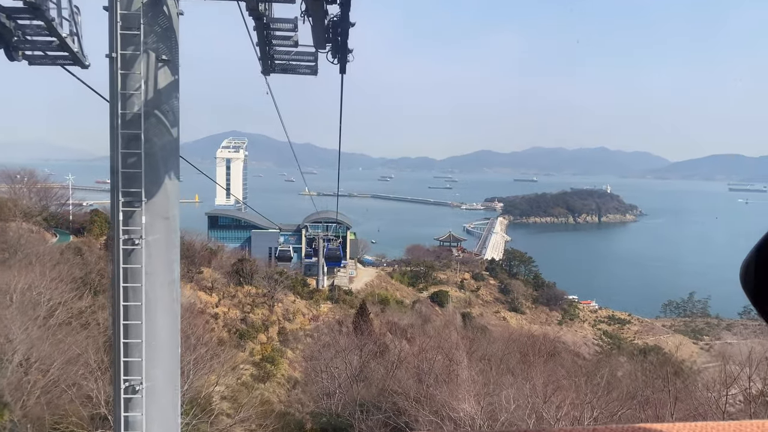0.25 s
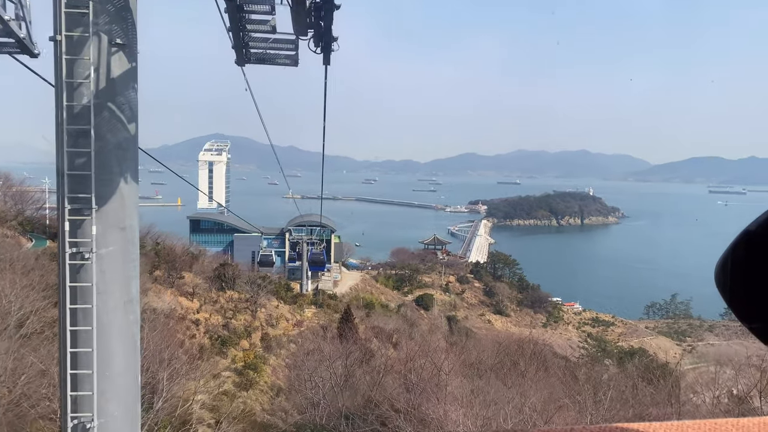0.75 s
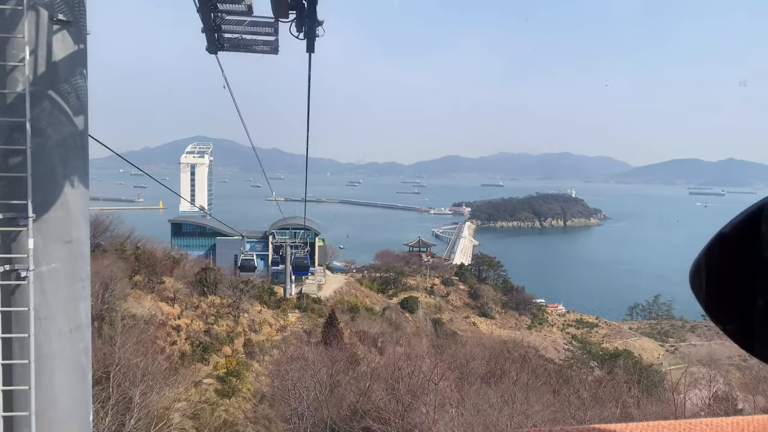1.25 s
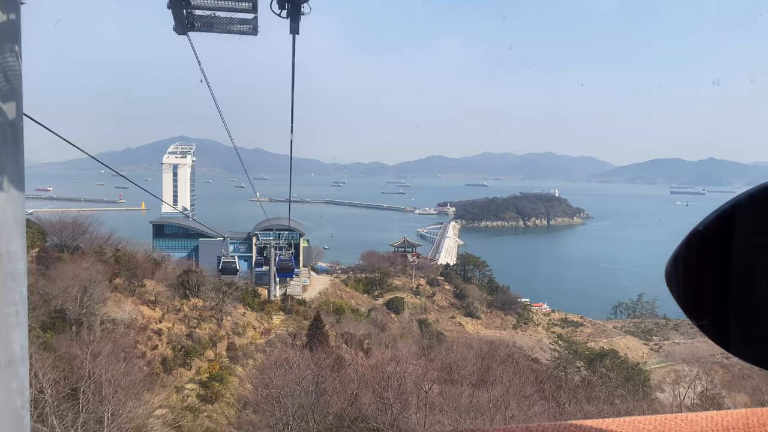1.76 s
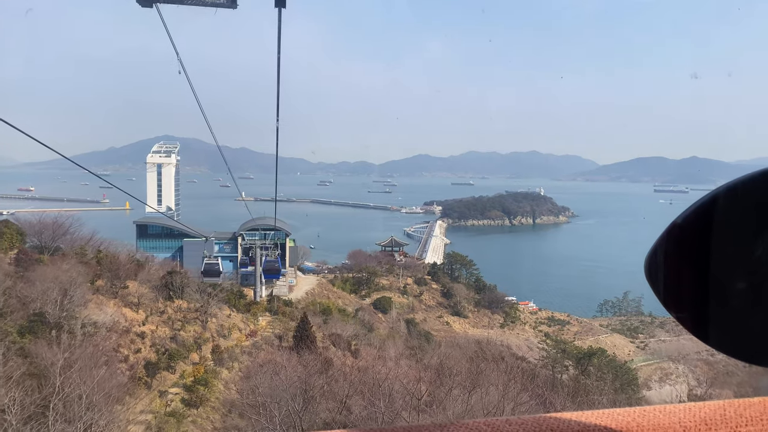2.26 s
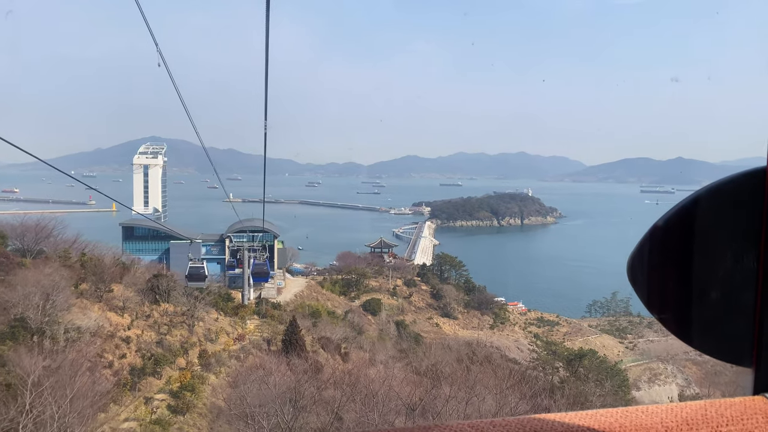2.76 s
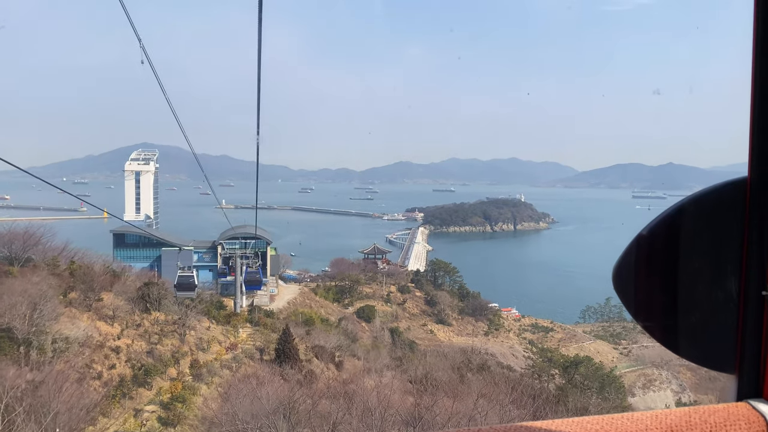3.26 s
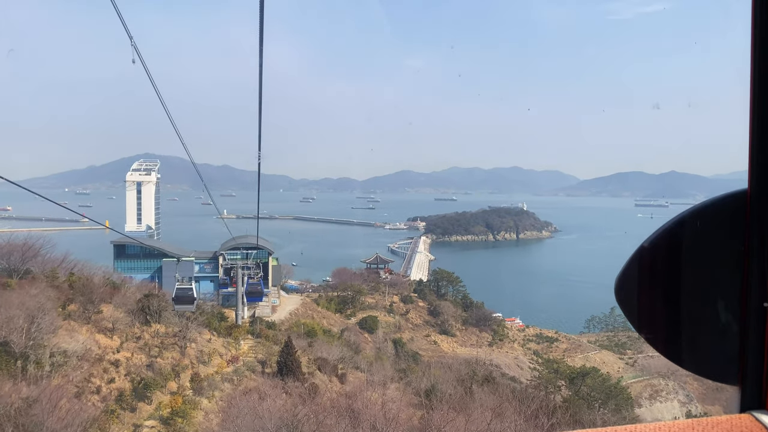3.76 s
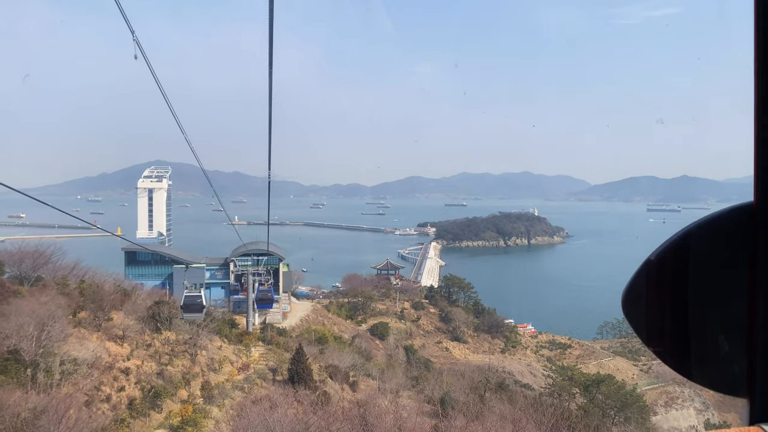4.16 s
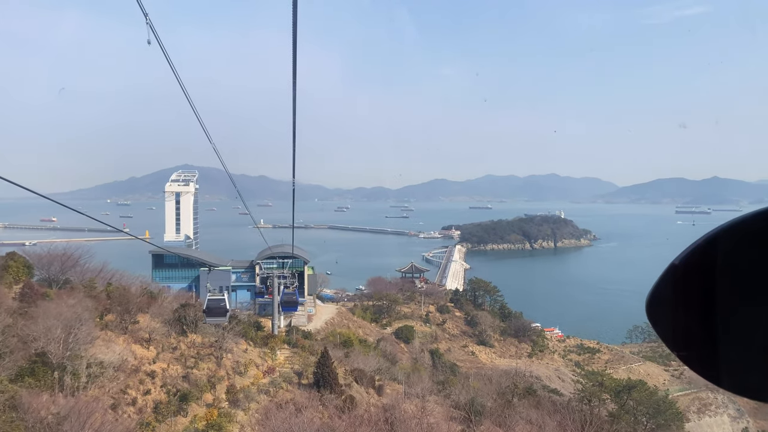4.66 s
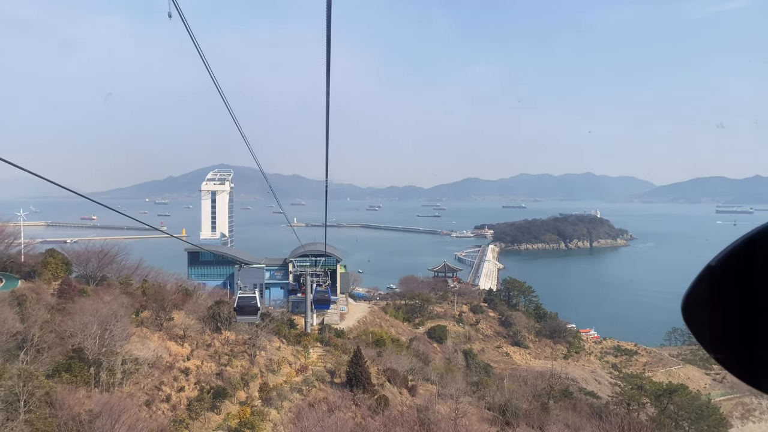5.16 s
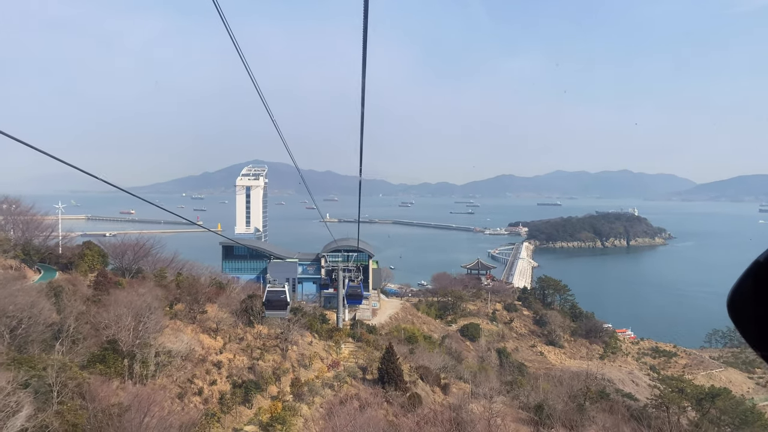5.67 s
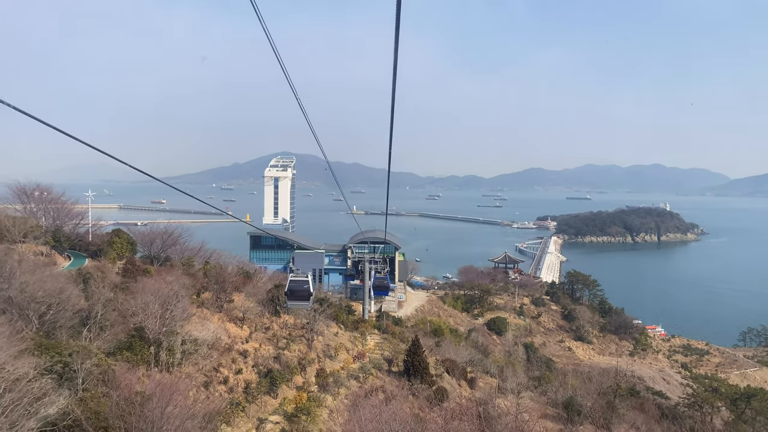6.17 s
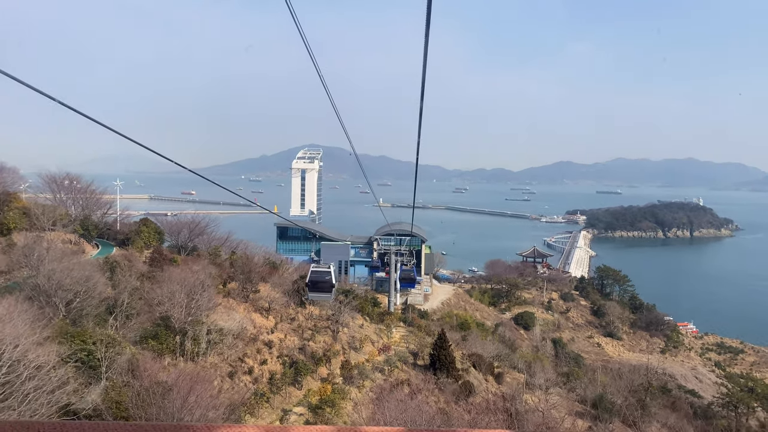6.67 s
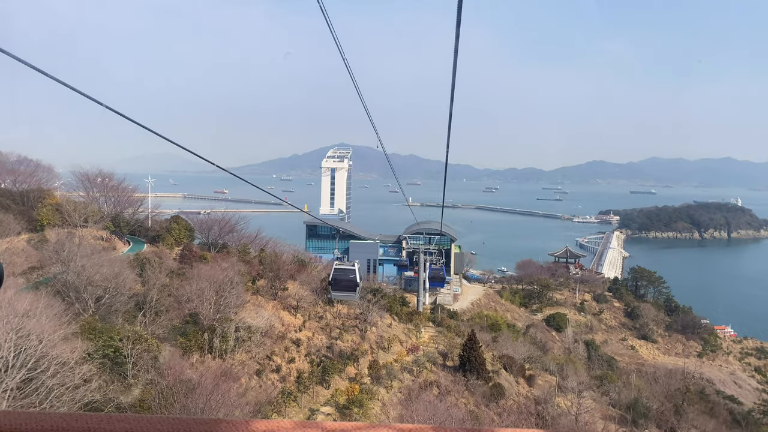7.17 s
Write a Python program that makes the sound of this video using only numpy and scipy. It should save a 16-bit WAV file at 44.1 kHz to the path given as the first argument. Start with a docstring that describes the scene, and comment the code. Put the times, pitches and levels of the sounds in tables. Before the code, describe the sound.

Inside a cable car gondola moving off a tower, low rumble and panel roar run throughout beneath faint airy wash on the windows. At 0 s a deep boom near 40 Hz is strong with two quick gusts, then eases by 0.4 s. A small tap comes around 1.1 s; gusts and boom swell near 1.6 s and again at 2.1-2.6 s, with light knocks and brief low tones. From 3.4 to 4.6 s the ride is roughest: heavy boom, dull thumps, sharp taps, rattling gusts at the door seam with thin metallic ringing, and a short climbing groan around 3.5-4.1 s. Gusts continue until about 5.9 s, with hissing wind along the right side. From 5.6 s a cable hum near 115 Hz throbs about three times a second; a soft swish passes at 6.4 s and hiss flares at 7.1 s as the boom stays weaker.

```python
"""A deep boom near 40 Hz with gusts rushing over it: a cable car gondola gliding off a tower in gusty wind.
Air blown across an open vent booms the cabin: a nearly pure tone with drifting pitch and level.
Gusts are shaped noise, mostly through the vent slot at first, later the door seam; edges and a pane ring.
Rumble, roar and thumps come through the panels, low narrow tones swell briefly, wind hisses along the shell.
The haul rope adds a throbbing hum late in the ride."""
import sys
import numpy as np
from scipy import signal
from scipy.fft import rfft, irfft, next_fast_len
from scipy.io import wavfile
from scipy.ndimage import uniform_filter1d, map_coordinates

SR = 44100
rng = np.random.default_rng(int(sys.argv[2]) if len(sys.argv) > 2 else 0)


def generate_wav(sig):
    """Save sig (samples, or channels by samples) to the path in sys.argv[1] as 16-bit PCM at SR."""
    pcm = np.round(np.clip(np.atleast_2d(sig).T, -1, 1) * 32767).astype(np.int16)
    wavfile.write(sys.argv[1], SR, pcm)


N = 327222


def amp(db):
    """Decibels to gain."""
    return 10 ** (np.asarray(db) / 20)


def unit(x):
    """x at rms 1."""
    return x / np.sqrt(np.mean(x ** 2) + 1e-20)


def along(points, hz):
    """(Hz, value) points read on a log frequency axis."""
    point_hz, value = np.transpose(points)
    return np.interp(np.log(hz + 1), np.log(point_hz + 1), value)


def curves(rows):
    """One value per sample for each column after the time."""
    time_s, *columns = np.transpose(rows)
    t = np.arange(N) / SR
    return [np.interp(t, time_s, column) for column in columns]


def wobble(rate_hz):
    """A smooth random curve, rate_hz knots a second."""
    coarse = np.arange(0, N + 64, 64)
    knots = rng.standard_normal(800)
    smooth = map_coordinates(knots, [coarse * rate_hz / SR], mode="wrap")
    return np.interp(np.arange(N), coarse, smooth)


def swing(hz):
    """Phase of an oscillation whose frequency moves."""
    return 2 * np.pi * np.cumsum(hz) / SR


def filtered(x, response):
    """x times a response of frequency."""
    size = next_fast_len(N + SR // 2)
    hz = np.fft.rfftfreq(size, 1 / SR)
    return irfft(rfft(x, size) * response(hz), size)[..., :N]


def lift(modes, hz):
    """The dB that a set of resonances adds at each frequency."""
    return sum(db / (1 + (2 * (hz - centre) / width) ** 2) for centre, width, db in modes)


# left-right likeness of the cabin's sound field: freq_hz, coherence
FIELD_COHERENCE = [(50, 0.75), (130, 0.88), (290, 0.69), (640, 0.27), (1400, 0.04), (15000, 0.027)]


def airflow(spectrum, modes, patchy_db, alike=FIELD_COHERENCE):
    """Turbulent stereo noise of rms 1: patchy in time and frequency, coloured by spectrum and resonances."""
    white = rng.standard_normal((2, N)).astype(np.float32)
    z = signal.stft(white, nperseg=512)[2]
    eddies = uniform_filter1d(rng.standard_normal(z.shape[1:]), size=7, axis=0)
    eddies = uniform_filter1d(eddies, size=9, axis=1)
    patches = amp(patchy_db * unit(eddies)).astype(np.float32)
    pair = signal.istft(z * patches, nperseg=512)[1][:, :N]

    def colour(hz):
        # the more alike the two ports, the more of the power lies in their sum
        coherence = np.clip(along(alike, hz), -1, 1)
        shares = (1 + np.outer([1, -1], coherence)) / 2
        return amp(along(spectrum, hz) + lift(modes, hz)) * np.sqrt(shares)

    mid, side = filtered(pair, colour)
    return unit(np.array([mid + side, mid - side]))


def reflections(x, echo_db, t60_s):
    """Close glass walls add a brief dense answer, different at each port; result at rms 1."""
    t = np.arange(SR // 8) / SR
    tail = rng.standard_normal((2, len(t))) * amp(-60 * t / t60_s)
    tail /= np.linalg.norm(tail, axis=1, keepdims=True)
    answer = signal.oaconvolve(x, tail, axes=1)[:, :N]
    return unit(x + amp(echo_db) * answer)


def blows(rows, attack_s):
    """Summed envelope of sudden blows, rows of start_s, level_db, t60_s."""
    t, force = np.arange(N) / SR, np.zeros(N)
    for start_s, level_db, t60_s in rows:
        age_s = np.maximum(t - start_s, 0)
        force += amp(level_db - 60 * age_s / t60_s) * (1 - np.exp(-age_s / attack_s))
    return force


# gusts through the cabin's gaps: start_s, length_s, level_db
GUSTS = [(0.033, 0.047, -67), (0.089, 0.048, -70.5), (0.245, 0.04, -75), (0.293, 0.023, -84),
         (0.73, 0.053, -85), (1.122, 0.02, -83.5), (1.198, 0.05, -84), (1.584, .17, -71.5),
         (1.627, 0.053, -73), (2.086, 0.11, -73.5), (2.213, 0.1, -72.5), (2.537, 0.061, -67.5),
         (3.459, 0.053, -69.5), (3.548, .04, -67.5), (3.762, 0.05, -69.5), (3.899, 0.035, -66),
         (3.983, 0.067, -69.5), (4.235, 0.032, -74.5), (4.332, 0.029, -65.5), (4.407, 0.031, -64),
         (4.502, 0.12, -66.5), (4.562, .02, -71.5), (4.683, 0.029, -69.5), (4.884, 0.054, -71),
         (5.047, 0.033, -66), (5.437, 0.042, -64.5), (5.648, 0.026, -70), (5.91, 0.059, -73),
         (6.565, 0.026, -74), (6.665, 0.035, -77)]
GUST_ATTACK_S, GUST_RELEASE_S = 0.022, 0.034  # time constants
DRAUGHT_DB = -95.5  # leak between gusts


def gust_level():
    """Gusts swell, hold and die away by one rule, powers added; level in dB over time."""
    t = np.arange(N) / SR
    power = amp(DRAUGHT_DB) ** 2
    for start_s, length_s, level_db in GUSTS:
        before = np.maximum(start_s - t, 0) / GUST_ATTACK_S
        after = np.maximum(t - start_s - length_s, 0) / GUST_RELEASE_S
        power = power + (amp(level_db) * np.exp(-np.minimum(before + after, 20))) ** 2
    return 10 * np.log10(power)


# where the wind blows in: mostly the vent at first, briefly the door near 0.8 s, later the door:
# time_s, door_share (0-1)
WIND_ENTRY = [(.45, .03), (.7, .9), (.85, .9), (1.05, .03), (2.7, 0.05), (3.5, 0.7), (4.3, 0.9), (7.4, 1)]


def door_share():
    """Share of the wind that goes through the door seam."""
    return np.clip(curves(WIND_ENTRY)[0], 0, 1)


# cabin shaking: time_s, level_db
SHAKING = [(0, -44), (.3, -47), (.55, -49), (2.2, -47), (3.3, -47), (3.45, -38), (4.45, -41.5), (5.35, -41),
           (5.9, -47), (7.42, -45.5)]
SHAKING_REST_DB = -47.5  # a calm stretch


def shaking():
    """Shaking from the hanger, in dB over a calm stretch."""
    return curves(SHAKING)[0] - SHAKING_REST_DB


# spectrum of the even hush: freq_hz, density_db (per Hz)
HUSH = [(300, -1.5), (3000, -6.5), (5500, 2.5), (8000, -4), (13000, -14), (15500, -6)]
HUSH_DB = -86


def hush():
    """Even faint noise under everything."""
    return amp(HUSH_DB) * airflow(HUSH, [], patchy_db=2.5)


# wind along the shell: time_s, level_db (before SLIPSTREAM_TRIM_DB)
SLIPSTREAM = [(0, -99), (.5, -100), (1.5, -91.5), (1.68, -84.5), (1.95, -92.5), (3.3, -96.5), (4.1, -92),
              (4.6, -77), (4.78, -87.5), (4.9, -80), (5.25, -82), (5.36, -75), (5.7, -74), (6.2, -96.5),
              (6.42, -81.5), (6.62, -91), (6.9, -91.5), (7.07, -71), (7.19, -73), (7.42, -89.5)]
# spectrum of its hiss: freq_hz, density_db (per Hz)
HISS = [(500, -26), (1500, 9.5), (3500, 4), (5000, 5), (6000, 5), (6900, -2), (10000, 0.5), (14000, -0.5),
        (15500, -10)]
# hiss from one side, alike at both ports in the treble: freq_hz, coherence
HISS_COHERENCE = [(3000, 0.11), (7000, 0.07), (10000, 0.55), (14000, 1)]
SLIPSTREAM_TRIM_DB, GUST_HISS_DB = 8.5, -16.5  # the latter relative to the gust
LEFT_LAG_S = .000215


def slipstream(gust_db):
    """Turbulent wind hisses along the right of the shell and with each gust, reaching the left port later."""
    wind_db, = curves(SLIPSTREAM)
    strength = np.hypot(amp(wind_db + SLIPSTREAM_TRIM_DB), amp(gust_db + GUST_HISS_DB))
    hiss = strength * amp(0.44 * wobble(28)) * airflow(HISS, [], patchy_db=1.3, alike=HISS_COHERENCE)
    return filtered(hiss, lambda hz: np.exp(1j * np.pi * LEFT_LAG_S * np.outer([-1, 1], hz)))


# outside air on the windows: time_s, level_db
WASH_LEVEL = [(0, -68.5), (.2, -69.5), (.58, -73), (.8, -68.5), (1.0, -70), (1.45, -69.5), (1.7, -64.5),
              (1.95, -69.5), (2.15, -65.5), (2.45, -66.5), (2.85, -67), (3.1, -66), (3.38, -67),
              (3.48, -62.5), (3.65, -64.5), (3.76, -61), (4.08, -61.5), (4.18, -65), (4.52, -60.5),
              (4.8, -64), (5.5, -65), (5.85, -66.5), (6.25, -67), (6.5, -67.5), (6.69, -63.5), (6.73, -69),
              (6.92, -70), (7.03, -64), (7.18, -64), (7.42, -68)]
# its spectrum: freq_hz, density_db (per Hz)
WASH = [(400, -20), (750, -6.5), (1000, 0.5), (1250, -0.5), (1600, -2.5), (1900, -3.5), (2150, -6.5),
        (2800, -12.5), (3600, -24), (6000, -46.5)]
# window resonances under it: centre_hz, width_hz, lift_db
WINDOWS = [(1100, 76, 4), (1320, 90, 4.5), (1518, 48, 7), (1960, 80, 2), (2820, 83, 2.5)]
WASH_SWAY_DB = 0.2  # slow unevenness


def wash():
    """Outside air washes over the windows as resonant noise."""
    level_db = curves(WASH_LEVEL)[0] + WASH_SWAY_DB * wobble(7)
    return amp(level_db) * reflections(airflow(WASH, WINDOWS, patchy_db=1.9), echo_db=-7, t60_s=.1)


# faint drones that rise with the rope's hum: pitch_hz, level_db (before the swell)
DRONES = [(134.3, -48), (155, -57), (199, -59), (651, -72)]
ROPE_HZ, ROPE_DB = 115, -44  # centre pitch; mid-throb level at full swell
ROPE_PEAK_S, ROPE_SPREAD_S = 6.6, 1.02  # middle and half length of the swell
THROB_AT_S, THROB_PERIOD_S = 5.86, 0.355  # a level crest, spacing
THROB_SWING_DB, THROB_SAG_HZ = 5.5, 2.5  # level and pitch swing either way


def rope():
    """The haul rope's hum comes down the hanger in even, sagging throbs under one swell, with drones above."""
    t = np.arange(N) / SR
    swell = np.exp(-((t - ROPE_PEAK_S) / ROPE_SPREAD_S) ** 4)
    turn = 2 * np.pi * (t - THROB_AT_S) / THROB_PERIOD_S
    pitch_hz = ROPE_HZ - THROB_SAG_HZ * np.sin(turn) + 1.8 * wobble(9)
    level_db = ROPE_DB + THROB_SWING_DB * np.cos(turn) + 1.0 * wobble(14)
    hum = amp(level_db) * unit(np.sin(swing(pitch_hz)))
    upper = np.zeros(N)
    for drone_hz, drone_db in DRONES:
        tone = unit(np.sin(swing(drone_hz + 1.2 * wobble(9))))
        upper += amp(drone_db + 2 * wobble(5)) * tone
    return swell * (hum + swell * upper)


# resonances of the cabin's air and panels: centre_hz, width_hz, lift_db
CABIN = [(86.7, 8.8, 9.5), (117.5, 16.5, 11.5), (174, 7.6, -3), (198.7, 13.8, 9.5), (251, 17.9, 12.5),
         (286.5, 16, 7), (329.7, 17, 5), (368, 1.8, 7), (383, 2.6, 7), (455.3, 8.3, 9), (485, 5.2, 6),
         (512.6, 24, 8), (558, 13, 5), (659.6, 54, 9)]
# rumble spectrum: freq_hz, density_db (per Hz)
RUMBLE = [(18, -19), (32, -10), (52, 2), (70, -2), (100, -11), (140, -21.5), (230, -28), (500, -80)]
RUMBLE_DB, RUMBLE_GROWTH = -43.5, 1  # calm level; dB per dB of shaking


def rumble(shake_db):
    """Shaking from the hanger rumbles through the cabin's resonances."""
    level_db = RUMBLE_DB + RUMBLE_GROWTH * shake_db + 0.77 * wobble(20)
    return amp(level_db) * airflow(RUMBLE, CABIN, patchy_db=0.1)


# panel roar: time_s, level_db (before ROAR_TRIM_DB)
ROAR_LEVEL = [(0.0, -47.5), (1.47, -48), (1.82, -47.5), (2.81, -47), (3.04, -47.5), (4.03, -46.5),
              (4.11, -45), (4.92, -46.5), (5.04, -47.5), (7.36, -50), (7.42, -47.5)]
# its spectrum: freq_hz, density_db (per Hz)
ROAR = [(50, -30.5), (110, -2.5), (160, 1.5), (260, -8), (400, -13), (580, -18.5), (800, -17.5),
        (1050, -25), (1600, -42), (3500, -77)]
ROAR_TRIM_DB = 1.5


def roar():
    """Panels roar through the cabin's resonances."""
    return amp(ROAR_TRIM_DB + curves(ROAR_LEVEL)[0]) * airflow(ROAR, CABIN, patchy_db=1.14)


# spectrum of a gust's shove: freq_hz, density_db (per Hz)
SHOVE = [(200, -21), (350, 1), (560, -7.5), (750, -9.5), (1100, -18.5), (2000, -47.5)]
SHOVE_DB, SHOVE_GROWTH = 8, 0.83  # over the gust on a calm stretch; dB per dB of shaking


def shove(gust_db, shake_db):
    """A gust shoves the panels, harder when the cabin shakes."""
    return amp(gust_db + SHOVE_DB + SHOVE_GROWTH * shake_db) * airflow(SHOVE, CABIN, patchy_db=-0.9)


# swish spectrum: freq_hz, density_db (per Hz)
SWISH = [(500, -12.5), (1200, 0), (1900, 2.5), (2700, 1), (3700, -4.5), (4700, -3), (6000, -12),
         (8000, -17), (15000, -30.5)]
SWISH_S, SWISH_SPREAD_S, SWISH_DB = 6.416, 0.076, -59.5  # middle, half length, peak level


def swish():
    """One broad, patchy rush close by swells and fades, with no ringing."""
    t = np.arange(N) / SR
    swell = 1 / (1 + ((t - SWISH_S) / SWISH_SPREAD_S) ** 4)
    return amp(SWISH_DB) * swell * airflow(SWISH, [], patchy_db=3.8)


# fittings shifting: start_s, level_db, t60_s
KNOCKS = [(1.066, -61, .17), (1.7175, -60, .07), (2.062, -59, .13), (2.535, -61, .1), (3.404, -58.5, .25),
          (3.487, -55.5, .12), (3.709, -55.5, .22), (3.9155, -56.5, .12), (4.502, -53.5, .07),
          (5.045, -58, .1), (5.228, -62, .15), (5.9, -60.5, .17)]
# knock spectrum: freq_hz, density_db (per Hz)
KNOCK = [(250, -12), (700, -2), (1100, 0), (1800, 0), (2600, -11), (4000, -26), (8000, -40), (15000, -52)]
# resonances of the fittings: centre_hz, width_hz, lift_db
FITTINGS = [(1020, 99, 0), (1500, 110, 7.5), (1800, 130, 3)]


def knocks():
    """A fitting shifts: a sharp tap of resonant noise that dies in the cabin."""
    return blows(KNOCKS, attack_s=.001) * airflow(KNOCK, FITTINGS, patchy_db=0)


# jolts of the hanger: start_s, level_db
THUMPS = [(3.394, -41), (3.514, -38), (3.76, -34), (3.86, -39), (3.95, -39), (4.028, -34), (4.345, -40),
          (4.41, -35), (4.498, -37), (5.45, -42)]
# thump spectrum: freq_hz, density_db (per Hz)
THUMP = [(35, -24.5), (70, 4), (110, -3.5), (170, -6.5), (260, -12), (380, -20.5), (600, -22.5),
         (1200, -45), (3000, -83)]
THUMP_ATTACK_S, THUMP_T60_S = .004, .17


def thumps():
    """Each jolt of the hanger knocks the cabin's shell: sudden, dull and short."""
    rows = [(start_s, level_db, THUMP_T60_S) for start_s, level_db in THUMPS]
    return blows(rows, THUMP_ATTACK_S) * airflow(THUMP, [], patchy_db=1.0)


# groan during the rough ride: time_s, repeat_rate_hz, level_db
GROAN = [(3.35, 23.2, -85), (3.5, 24, -55), (3.75, 25.4, -52), (4.03, 27, -51.5), (4.15, 27.6, -85)]
GROAN_ORDERS = range(10, 16)  # sounding multiples of the rate
GROAN_TILT_DB = -12  # per octave


def groan():
    """A row of close partials climbs together, each wavering in strength."""
    rate_hz, level_db = curves(GROAN)
    phase = swing(rate_hz)
    partials = np.zeros(N)
    for order in GROAN_ORDERS:
        strength = amp(GROAN_TILT_DB * np.log2(order) + 2.5 * wobble(8))
        partials += strength * np.sin(order * phase + rng.uniform(0, 2 * np.pi))
    return amp(level_db) * unit(partials)


# brief swells of low, narrow tones: middle_s, length_s, pitch_hz, level_db
TONE_SWELLS = [(0.08, .12, 80.5, -49), (0.333, .14, 118.3, -45), (.39, 0.11, 203.9, -49),
               (1.57, 0.1, 201.2, -46.5), (1.799, 0.091, 119.9, -45.5), (2.167, .2, 83.6, -43.5),
               (2.57, 0.08, 202.2, -48), (2.577, 0.0806, 676.5, -55.5), (2.799, 0.19, 201.7, -47.5),
               (3.216, .12, 83.55, -42.5), (3.358, 0.13, 251, -53.5), (3.469, 0.11, 116.7, -40),
               (3.936, 0.043, 683, -55.5), (3.956, 0.11, 243, -47.5), (4.431, .14, 80.5, -39),
               (4.43, .12, 328, -54.5), (4.44, .1, 200, -48), (4.563, 0.068, 682, -53.5),
               (4.84, .1, 278, -51.5), (4.85, .16, 202, -45.5), (5.127, .2, 82.14, -42.5),
               (5.452, .11, 252, -53.5), (5.623, 0.12, 82.6, -43), (5.73, .14, 201, -50.5),
               (6.55, 0.12, 203.3, -52)]


def tone_swells():
    """Each row swells and fades as a brief, slightly wandering drone."""
    t, out = np.arange(N) / SR, np.zeros(N)
    drift_hz = 3 * wobble(16)
    for middle_s, length_s, pitch_hz, level_db in TONE_SWELLS:
        near = np.abs(t - middle_s) < 2 * length_s
        swell = np.exp(-((t[near] - middle_s) / length_s) ** 2 * 2)
        phase = swing(pitch_hz + drift_hz[near]) + rng.uniform(0, 2 * np.pi)
        out[near] += amp(level_db) * swell * np.sqrt(2) * np.sin(phase)
    return out


def ringing(modes):
    """Wind-driven random modes, each as strong as the wind's way in allows."""
    t, door, out = np.arange(N) / SR, door_share(), np.zeros((2, N))
    for centre_hz, width_hz, vent_db, door_db in modes:
        # size and phase drift as fast as the mode is wide
        drift = np.array([wobble(width_hz) + 1j * wobble(width_hz) for port in range(2)])
        tone = np.real(drift * np.exp(2j * np.pi * centre_hz * t))
        out += amp(vent_db + door * (door_db - vent_db)) * unit(tone)
    return out


# ringing of the window pane: centre_hz, width_hz, vent_db, door_db (by where it is blown, at drive 1)
PANE = [(681, 24, -60, -62), (792, 11, -60.5, -67.5), (741, 37, -60, -72)]
PANE_FULL_DB, PANE_GROWTH = -65.5, 0.5  # gust level for drive 1; dB of drive per dB of gust
PANE_IDLE_DB = -19.5  # drive between gusts


def pane(gust_db):
    """The window always rings hollowly; gusts shake it harder, its ring growing slower than the rush."""
    drive = np.hypot(amp(PANE_GROWTH * (gust_db - PANE_FULL_DB)), amp(PANE_IDLE_DB))
    return drive * ringing(PANE)


CHATTER_PER_S, CHATTER_RING_S, CHATTER_DEPTH = 80, .005, .3  # tick rate, decay constant, scale of the ticks


def chatter():
    """Irregular, quickly dying ticks of the loose edges roughen a gust; a gain of rms 1."""
    ticks = (rng.random(N) < CHATTER_PER_S / SR) * rng.uniform(0.49, 0.69, N)
    decay = np.exp(-1 / (CHATTER_RING_S * SR))
    return unit(1 + CHATTER_DEPTH * signal.lfilter([1], [1, -decay], ticks))


# metallic ringing of the gap edges: centre_hz, width_hz, vent_db, door_db (over the gust, by where it blows)
WHISTLES = [(3520, 80, -15.5, -27), (3595, 65, -18, -13), (4260, 100, -13, -22)]
# gusts slapping the loose edges: start_s, level_db, t60_s
SLAPS = [(2.512, -70, .25), (3.565, -61.5, .3), (3.711, -65, .14), (3.902, -63.5, .25), (4.343, -60, .17),
         (4.417, -59.5, .22), (4.697, -67, .15)]
# slap spectrum: freq_hz, density_db (per Hz)
SLAP = [(600, -12), (1800, -2), (2700, 1), (3500, -2), (4700, -1.5), (5600, -6), (7500, -16), (10000, -30),
        (15000, -34)]
# resonances of the door seam: centre_hz, width_hz, lift_db
SEAM = [(1800, 150, 5), (2560, 100, 4), (3140, 70, 3.5), (3590, 110, 7.5), (4115, 60, 7), (4300, 110, 6),
        (4590, 150, 7.5), (4760, 70, 6), (5190, 110, 5), (5660, 120, 6), (5850, 90, 4), (7250, 870, 8)]


def edges(gust_db):
    """Metal edges of the gaps sing thinly in every gust and clash briefly when slapped."""
    whistle = amp(gust_db) * ringing(WHISTLES)
    slap = blows(SLAPS, attack_s=.005) * chatter() * airflow(SLAP, SEAM, patchy_db=2.0)
    return whistle + slap


# resonances of the vent slot: centre_hz, width_hz, lift_db
SLOT = [(1420, 130, 6), (1770, 90, 7), (1900, 110, 10), (2480, 80, 5), (2860, 70, 6), (3015, 70, 7),
        (3520, 120, 8), (3630, 70, 7), (3880, 80, 4), (4255, 200, 11), (4630, 100, 7), (5520, 90, 6),
        (7240, 520, 9)]
# gust rush spectrum, slot and seam: freq_hz, density_db (per Hz)
RUSH = [(200, -10), (400, 10.5), (1000, -2.5), (1700, 1), (2400, -2.5), (3200, -0.5), (4600, -8.5),
        (5600, -11.5), (6600, -17.5), (9000, -32), (12500, -35), (15500, -25.5)]


def gaps(phase, gust_db):
    """Turbulent gusts rush through vent slot and door seam, fluttering, chattering, pumped by the boom."""
    # a weak draught slips through without turbulence, so its sound falls away fast
    rush_db = gust_db + 0.66 * np.minimum(gust_db + 89.0, 0)
    level_db = rush_db + 4.5 + 0.8 * wobble(45)
    door = door_share()
    slot = np.sqrt(1 - door) * airflow(RUSH, SLOT, patchy_db=1.0)
    seam = np.sqrt(door) * airflow(RUSH, SEAM, patchy_db=2.5)
    pumping = 1 + .18 * np.sin(phase)
    return amp(level_db) * pumping * chatter() * reflections(slot + seam, echo_db=0, t60_s=0.092)


# boom pitch drifting with the flow over the vent: time_s, pitch_hz
BOOM_PITCH = [(0.0, 41.33), (0.1, 40.89), (0.76, 40.88), (1.12, 44.2), (1.28, 39.72), (2.62, 39.93),
              (2.97, 41.19), (3.29, 39.97), (5.27, 39.38), (5.5, 43.7), (5.7, 39.73), (6.74, 39.92),
              (7.0, 43.1), (7.09, 45.4), (7.21, 40.4), (7.42, 41.4)]


def boom_phase():
    """Phase of the cabin air's swing, its pitch drifting and wavering."""
    return swing(curves(BOOM_PITCH)[0] + .4 * wobble(6))


# cabin air swinging as one mass: time_s, level_db (before BOOM_TRIM_DB)
BOOM = [(0.0, -24), (0.04, -29), (0.37, -37.5), (0.99, -37), (1.14, -53), (1.22, -37), (1.63, -27.5),
        (1.73, -33.5), (1.78, -41.5), (1.84, -33.5), (2.02, -47.5), (2.07, -36), (2.5, -27), (2.59, -26),
        (2.65, -38), (2.78, -40.5), (3.22, -48.5), (3.39, -27), (3.72, -22), (4.07, -23.5), (4.17, -32.5),
        (4.28, -24), (5.27, -26.5), (5.35, -31), (5.41, -49), (5.5, -28), (5.62, -40.5), (6.49, -36.5),
        (7.09, -52), (7.34, -36), (7.42, -48.5)]
BOOM_TRIM_DB, OCTAVE_DB = -0.34, -28.5  # the latter: second harmonic re fundamental


def boom(phase):
    """The cabin sounds like a huge bottle blown across its neck: nearly a pure tone."""
    level_db = curves(BOOM)[0] + BOOM_TRIM_DB + .9 * wobble(14)
    return amp(level_db) * unit(np.sin(phase) + amp(OCTAVE_DB) * np.sin(2 * phase))


def scene():
    """All the sources, heard from a seat in the cabin."""
    phase, gust_db, shake_db = boom_phase(), gust_level(), shaking()
    outside = hush() + slipstream(gust_db) + wash() + rope()
    panels = rumble(shake_db) + roar() + shove(gust_db, shake_db)
    events = swish() + knocks() + thumps() + groan() + tone_swells()
    gusts = pane(gust_db) + edges(gust_db) + gaps(phase, gust_db)
    return outside + panels + events + gusts + boom(phase)


# the right port is duller in the treble: freq_hz, left_minus_right_db
PORTS = [(40, 1.1), (75, 3.5), (115, -3), (200, 0.5), (650, 0.1), (1300, 1.5), (2400, 6), (4400, 4),
         (7000, 5.5), (9000, -0.5)]
TOP_HZ, EDGE_S = 15500, .006  # band limit; fade at start and end


def record(dry):
    """Two slightly unequal microphone ports, a band limit and edge fades."""
    t = np.arange(N) / SR
    fade = np.sin(np.pi / 2 * np.clip(np.minimum(t, t[::-1]) / EDGE_S, 0, 1)) ** 2

    def response(hz):
        port_db = np.outer([1, -1], along(PORTS, hz)) / 2
        return amp(port_db) * (hz < TOP_HZ)

    return filtered(dry * fade, response)


dry = scene()
out = record(dry)
generate_wav(out)
```